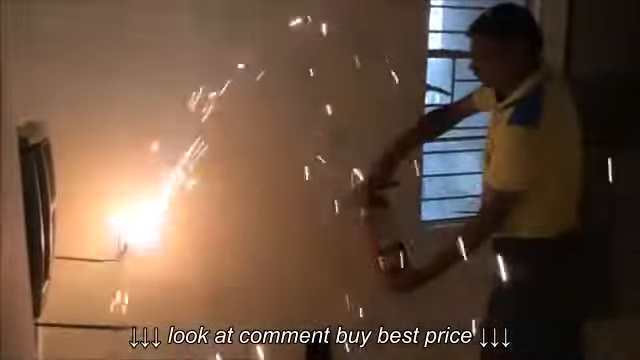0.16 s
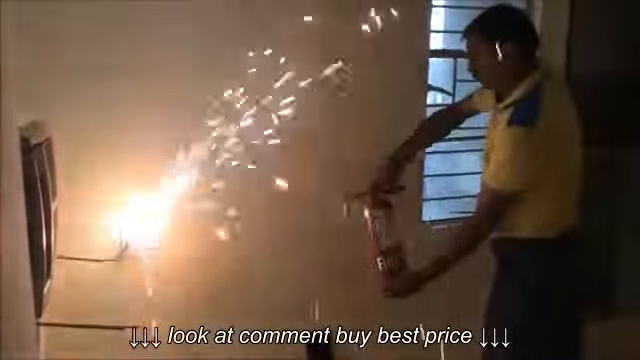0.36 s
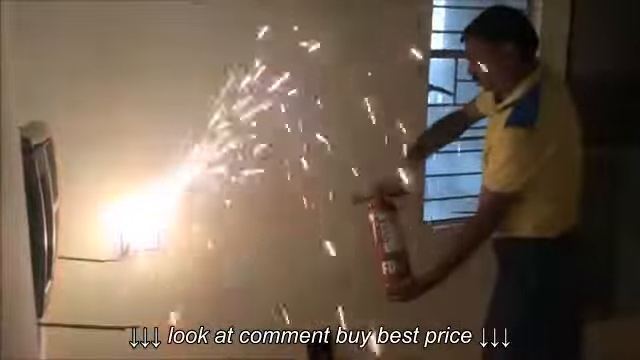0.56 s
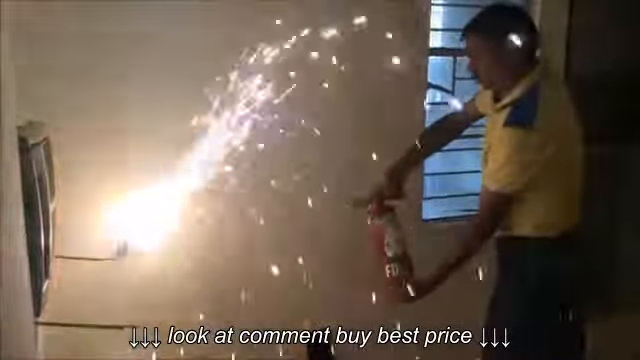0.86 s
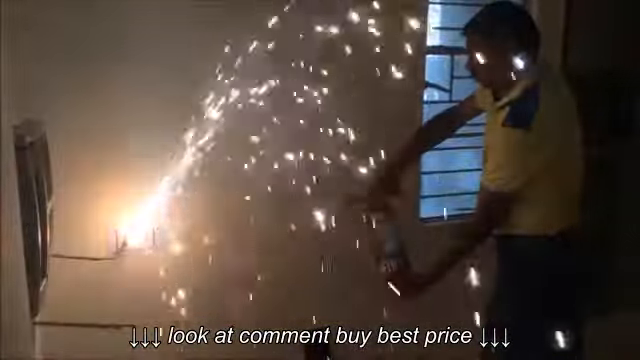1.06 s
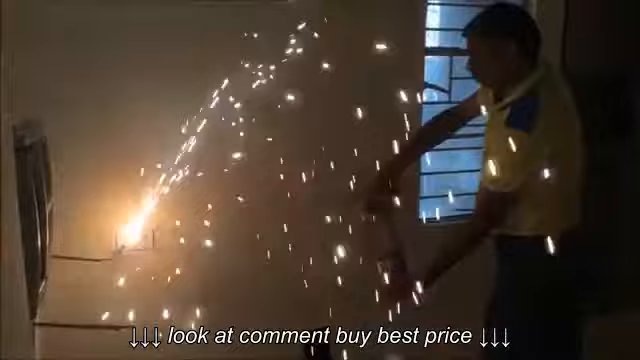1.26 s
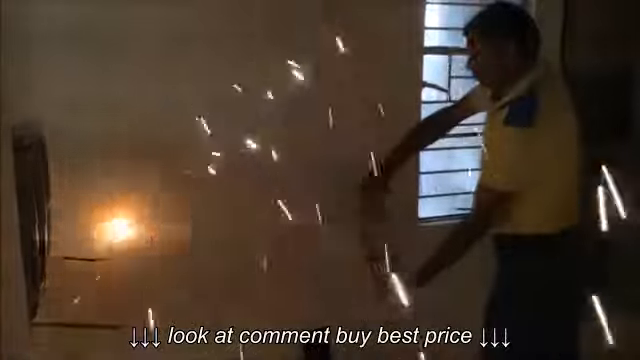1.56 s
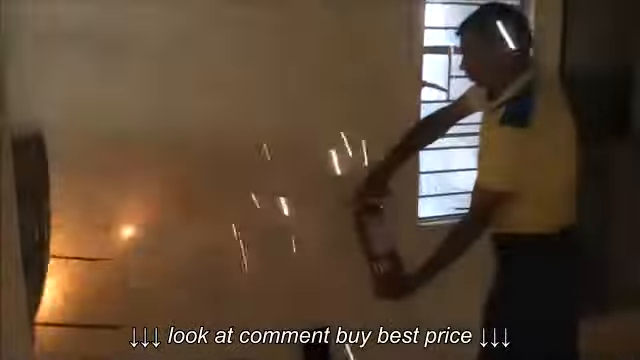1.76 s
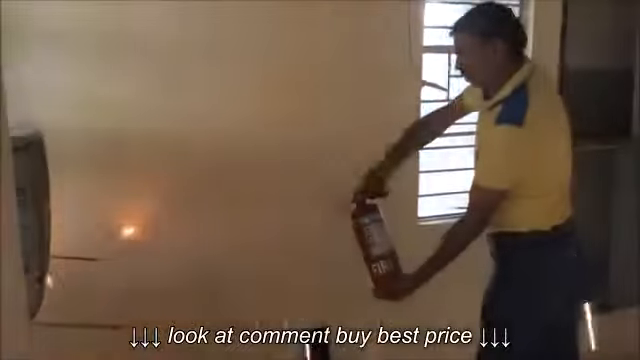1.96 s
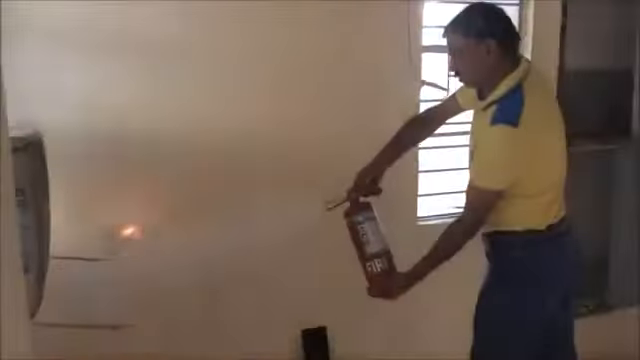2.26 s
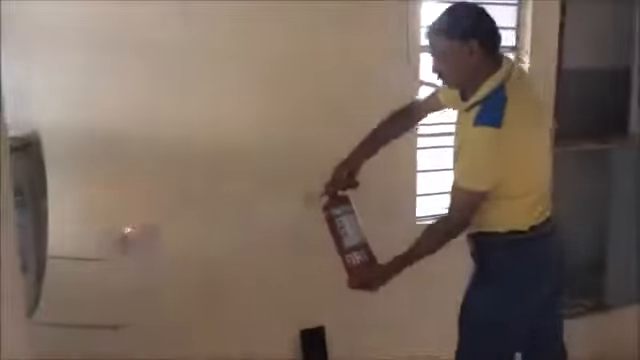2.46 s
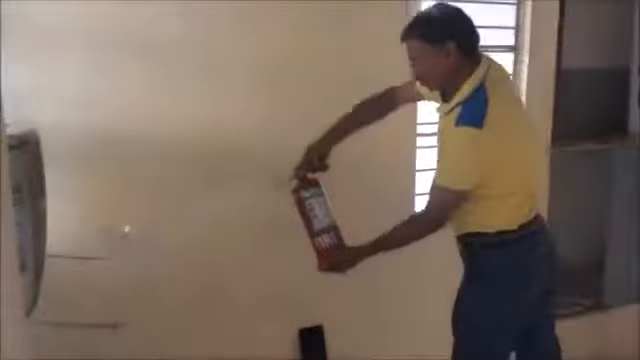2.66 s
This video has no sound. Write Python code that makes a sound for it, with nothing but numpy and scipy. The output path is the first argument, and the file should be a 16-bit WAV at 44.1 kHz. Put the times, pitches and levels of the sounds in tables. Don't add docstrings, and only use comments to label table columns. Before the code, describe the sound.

Fire extinguisher hissing in a bare room: a short puff, then a long roaring blast

```python
import sys
import numpy as np
from scipy import signal
from scipy.fft import rfft, irfft, dct, next_fast_len
from scipy.io import wavfile
from scipy.ndimage import uniform_filter1d, map_coordinates

SR = 44100
rng = np.random.default_rng(int(sys.argv[2]) if len(sys.argv) > 2 else 0)


def generate_wav(sig):
    pcm = np.round(np.clip(np.atleast_2d(sig).T, -1, 1) * 32767).astype(np.int16)
    wavfile.write(sys.argv[1], SR, pcm)


def invert_db(x):
    u = np.asarray(x, float) / 20
    return 10 ** u


N = 123479
LEAD = SR // 2
T = np.arange(-LEAD, N) / SR

# opens in seconds, shuts in seconds, settling time in seconds, hiss in dB, roar in dB.
SQUEEZES = [
    (-.3, -.11, .05, -13.5, -21),
    (.17, .41, .1, -10.2, -23),
    (.598, 2.445, .02, -11.8, -16.3),
]
# frequency in Hz, level in dB per Hz.
HISS_COLOUR = [(900, -28), (2000, -11.5), (3000, -6.5), (5000, -2.5), (9000, -6), (12000, -14),
               (15000, -25)]
# frequency in Hz, level in dB per Hz.
ROAR_COLOUR = [(300, -25.5), (480, -2.5), (900, -2.5), (1800, -1), (2600, -1), (4000, -16.5), (7000, -43)]
# frequency in Hz, width in Hz, peak in dB.
BLAST_WHISTLES = [(867, 300, 6.5), (1800, 260, 7.5), (2295, 200, 7)]
# first pitch in Hz, last pitch in Hz, level in dB.
PUFF_WHISTLES = [(1333, 1120, -30.5), (2744, 2520, -24), (4075, 3900, -26), (8460, 8200, -22)]
# frequency in Hz, width in Hz, peak in dB.
SHUT_SQUEAL = [(1064, 150, 7)]
# start in seconds, end in seconds, level in dB.
DRAUGHTS = [
    (.01, 0.193, -37),
    (0.32, 0.398, -19.5),
    (0.652, 2.438, -25.5),
]
# time in seconds, peak in dB.
THUMPS = [
    (0.786, -11.5),
    (0.94, -14),
    (1.077, -15),
    (1.511, -6),
    (1.641, -19),
    (2.073, -7),
    (2.089, -10),
    (2.111, -8),
]
# frequency in Hz, level in dB per Hz.
BUFFET_COLOUR = [(20, -28), (40, -7.5), (70, 0.6), (150, -2), (300, -4.5), (450, -10.5), (800, -25.5)]
# frequency in Hz, time to fall by 60 dB in seconds.
WALL_RING = [(300, 0.69), (1500, 0.75), (4000, 0.66), (8000, 0.47), (14000, 0.34)]
# frequency in Hz, width in Hz, peak in dB.
FLAME_TONES = [(357, 150, 7), (540, 190, 6)]
# frequency in Hz, level in dB per Hz.
AIR_COLOUR = [(30, -7), (70, -0.5), (300, -8.5), (800, 0.3), (3000, -4.5), (8000, -15), (15000, -35)]
# frequency in Hz, width in Hz, gain in dB.
MIC_PEAKS = [(3724, 755, 10), (6550, 1230, 4), (7230, 620, -6.5), (8330, 760, 3.5)]
# frequency in Hz, rounding step over band level in dB.
COARSENESS = [(200, -4), (2000, -3), (6000, -6), (11000, -4.5), (15000, -4)]
# frequency in Hz, share of bands lost from 0 to 1.
LOST_SHARE = [(11000, 0), (12500, .08), (13300, .42), (15000, .4)]
STARVED_FRAMES = np.array([19, 97, 123])

RISE_S, SHUT_S = .044, .032
TOP_HZ = 15000


def unit(x):
    return x / np.sqrt(np.mean(x ** 2) + 1e-20)


def along(points, hz):
    f, value = np.transpose(points)
    return np.interp(np.log(hz + 1), np.log(f + 1), value)


def bumps(rows, hz):
    return sum(db * np.exp(-.5 * ((hz - centre) / (width / 2)) ** 2) for centre, width, db in rows)


def wobble(rate):
    return map_coordinates(rng.standard_normal(900), [(T - T[0]) * min(rate, 260)])


def filtered(x, response):
    m = next_fast_len(x.shape[-1] + 8192)
    spectrum = rfft(x, m) * response(np.fft.rfftfreq(m, 1 / SR))
    return irfft(spectrum, m)[..., :x.shape[-1]]


def rush(response, patchy_db):
    z = signal.stft(rng.standard_normal(len(T) + 512), nperseg=512)[2]
    patches = uniform_filter1d(rng.standard_normal(z.shape), size=6, axis=0)
    patches = uniform_filter1d(patches, size=10, axis=1)
    x = signal.istft(z * invert_db(patchy_db * unit(patches)), nperseg=512)[1][:len(T)]
    return unit(filtered(x, response))


def coloured(colour, patchy_db):
    return rush(lambda hz: invert_db(along(colour, hz)), patchy_db)


def ring(rows):
    return rush(lambda hz: invert_db(bumps(rows, hz) * 4), patchy_db=1.5)


def gate(start, end, rise, fall):
    opening = np.clip((T - start) / rise, 0, 1)
    closing = np.clip((end + fall - T) / fall, 0, 1)
    return np.sin(np.pi / 2 * opening * closing) ** 2


def jet():
    sag_db_per_s, swell_db = -1.46, -7
    flutter_db = .3 * wobble(6.47) + 0.44 * wobble(40.3)
    hiss, roar = np.zeros(len(T)), np.zeros(len(T))
    for start, end, settle, hiss_db, roar_db in SQUEEZES:
        age = np.maximum(T - start, 0)
        flow_db = sag_db_per_s * age + swell_db * np.exp(-age / settle) + flutter_db
        flow = gate(start, end, RISE_S, SHUT_S) * invert_db(flow_db)
        hiss += invert_db(hiss_db) * flow
        roar += invert_db(roar_db) * flow * gate(start, end, 1.4 * RISE_S + settle, SHUT_S)
    whistles = valve_whistles()
    hiss = hiss * coloured(HISS_COLOUR, patchy_db=.7)
    roar = roar * coloured(ROAR_COLOUR, patchy_db=1.76)
    return hiss + roar + whistles


def valve_whistles():
    _, (opens, shuts, *_), (blast, *_) = SQUEEZES
    puff = gate(opens, shuts - .03, 0.058, 0.044) * sinking(PUFF_WHISTLES, opens, shuts)
    squeal = invert_db(-27) * gate(shuts - .03, shuts + .03, 0.016, .1) * ring(SHUT_SQUEAL)
    first_rush = invert_db(-16) * gate(blast + 0.025, blast + .11, RISE_S, 0.1) * ring(BLAST_WHISTLES)
    return puff + squeal + first_rush


def sinking(rows, start, end):
    way = np.clip((T - start) / (end - start), 0, 1)
    total = np.zeros(len(T))
    for first_hz, last_hz, db in rows:
        phase = 2 * np.pi * np.cumsum(first_hz + (last_hz - first_hz) * way) / SR
        total += invert_db(db) * (wobble(200) * np.cos(phase) + wobble(200) * np.sin(phase))
    return total


def walls(x):
    hz, t, z = signal.stft(rng.standard_normal((4, SR)), SR, nperseg=256)
    decay_db = -60 * t / along(WALL_RING, hz)[:, None]
    tails = signal.istft(z * invert_db(decay_db), SR, nperseg=256)[1]
    share = np.abs(np.cos(np.pi * (T / 1.2 + np.arange(4)[:, None] / 4))) / np.sqrt(2)
    wet = signal.fftconvolve(x * share, tails / np.linalg.norm(tails[0]), axes=1).sum(axis=0)
    return np.pad(wet, (200, 0))[:len(x)]


def draught():
    thump_s, thump_hz = .002, 90
    level = sum(invert_db(db) * gate(start, end, 0.026, 0.0092) for start, end, db in DRAUGHTS)
    lumps_db = 2.5 * wobble(24.08) + 2.2 * wobble(70)
    buffeting = level * unit(invert_db(lumps_db) * coloured(BUFFET_COLOUR, patchy_db=1.5))
    thumps = np.zeros(len(T))
    for time, db in THUMPS:
        swell = np.exp(-.5 * ((T - time) / thump_s) ** 2)
        thumps += invert_db(db) * swell * np.cos(2 * np.pi * thump_hz * (T - time) - .6)
    return buffeting + thumps


def flame():
    return invert_db(-36) * gate(-.4, 0.22, .05, 0.071) * ring(FLAME_TONES)


def building_air():
    return invert_db(-33.5) * coloured(AIR_COLOUR, patchy_db=3.0)


def scene():
    gas = jet()
    air = building_air()
    mono = invert_db(-1.6) * gas + invert_db(-2.5) * walls(gas) + draught() + flame() + air
    return np.array([mono[LEAD:], mono[LEAD:]])


def microphone(x):
    low_cut_hz = 25
    return filtered(x, lambda hz: invert_db(bumps(MIC_PEAKS, hz) - 3) * (hz < TOP_HZ)
                    * hz ** 2 / (hz ** 2 + low_cut_hz ** 2))


def soft_clip(x):
    top, hardness = .86, 6.5
    return x / (1 + np.abs(x / top) ** hardness) ** (1 / hardness)


def camera_grain(x):
    size, lag, spread_db, starved_db = 940, 640, 3, 20.5
    k = np.arange(size)
    window = np.sin(np.pi * (np.arange(2 * size) + .5) / (2 * size))
    front = 2 * size - lag
    padded = np.pad(x, (front, 3 * size))
    blocks = padded[:(len(x) // size + 4) * size].reshape(-1, size)
    p, q, r, s = np.split(np.hstack([blocks[:-1], blocks[1:]]) * window, 4, axis=1)
    c = dct(np.hstack([-r[:, ::-1] - s, p - q[:, ::-1]]), type=4, norm="ortho")

    band, hz = k // 10, k * SR / 2 / size
    level = np.sqrt(np.add.reduceat(c ** 2, np.arange(0, size, 10), axis=1) / 10 + 1e-20)
    luck = unit(uniform_filter1d(rng.standard_normal(level.shape), size=2, axis=0))[:, band]
    step = level[:, band] * invert_db(along(COARSENESS, hz) + spread_db * luck)
    kept = 1 / (1 + np.exp(1.7 * luck)) > along(LOST_SHARE, hz)
    starved = STARVED_FRAMES + 1
    step[starved] = invert_db(starved_db) * np.median(level[starved], axis=1)[:, None]
    rounded = kept * np.sign(c) * np.floor(np.abs(c) / step + .4) * step

    u, v = np.split(dct(rounded, type=4, norm="ortho"), 2, axis=1)
    y = np.hstack([v, -v[:, ::-1], -u[:, ::-1], -u]) * window
    return (y[1:, :size] + y[:-1, size:]).ravel()[front - size:][:len(x)]


def top_cut(x):
    return signal.sosfilt(signal.butter(12, 15220, fs=SR, output="sos"), x)


def record(dry):
    x = soft_clip(microphone(dry.mean(axis=0)))
    x = filtered(camera_grain(x), lambda hz: hz < TOP_HZ)
    mix = x * np.ones_like(dry)
    return top_cut(mix)


dry = scene()
out = record(dry)
generate_wav(out)
```